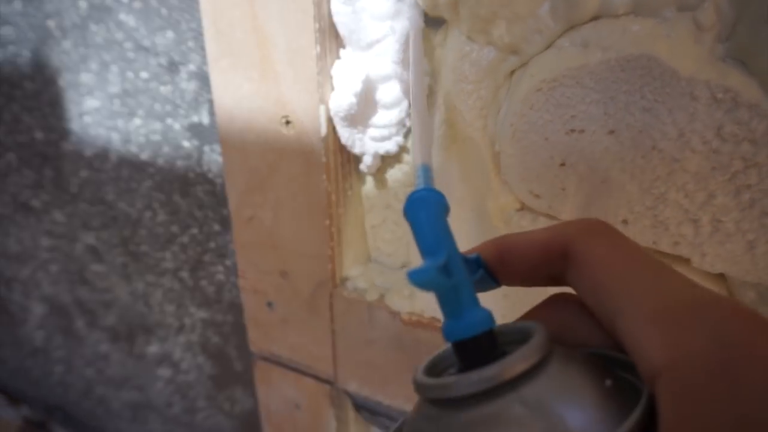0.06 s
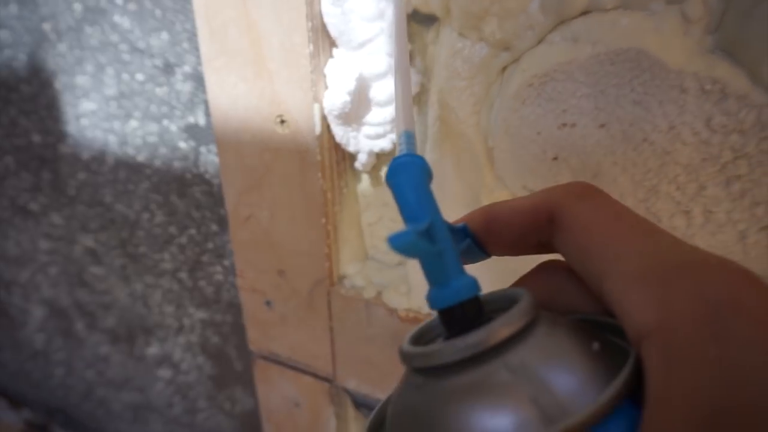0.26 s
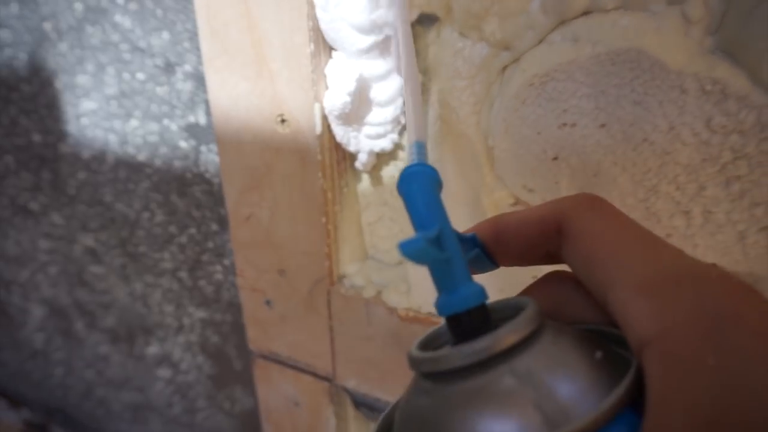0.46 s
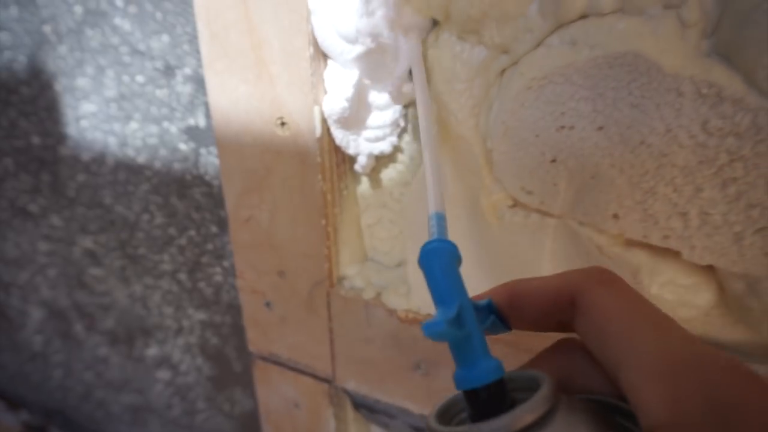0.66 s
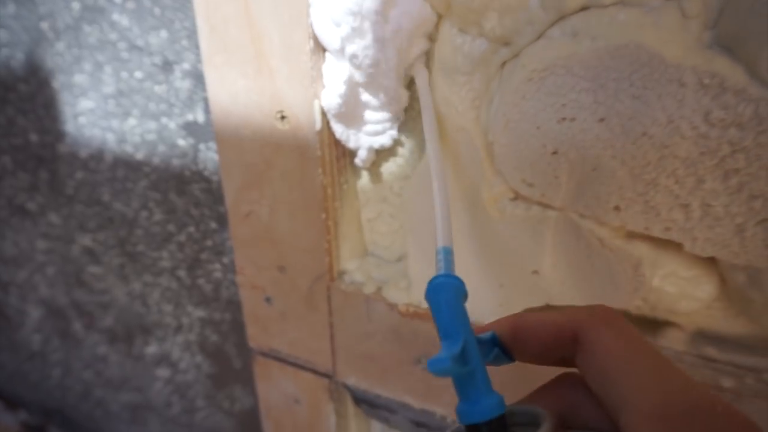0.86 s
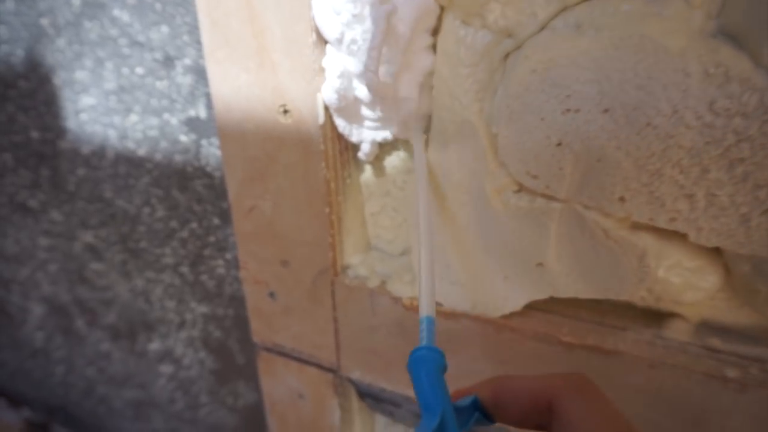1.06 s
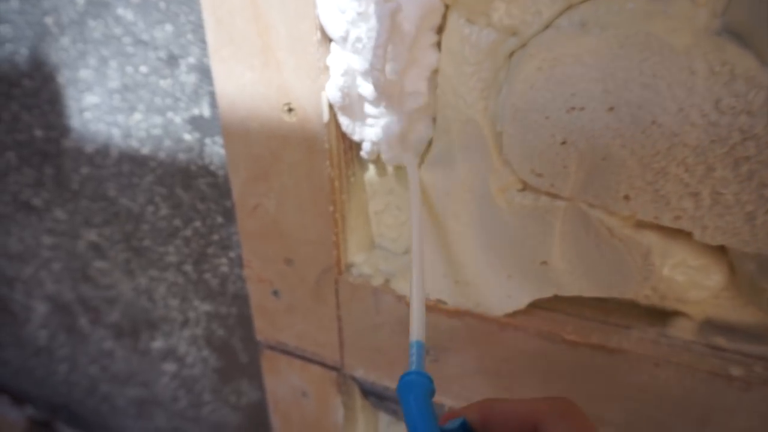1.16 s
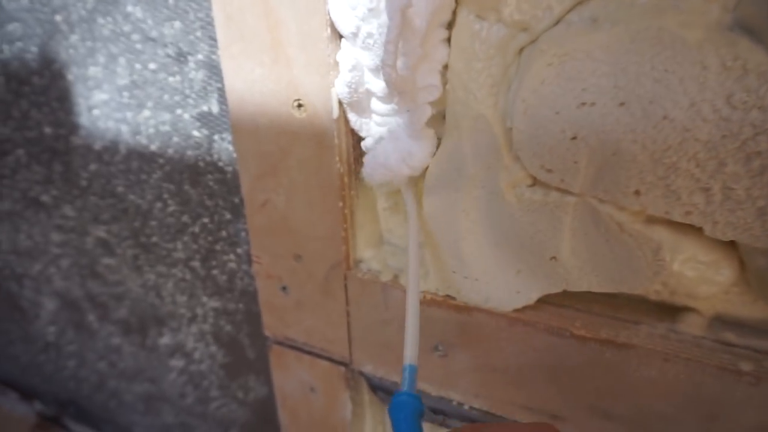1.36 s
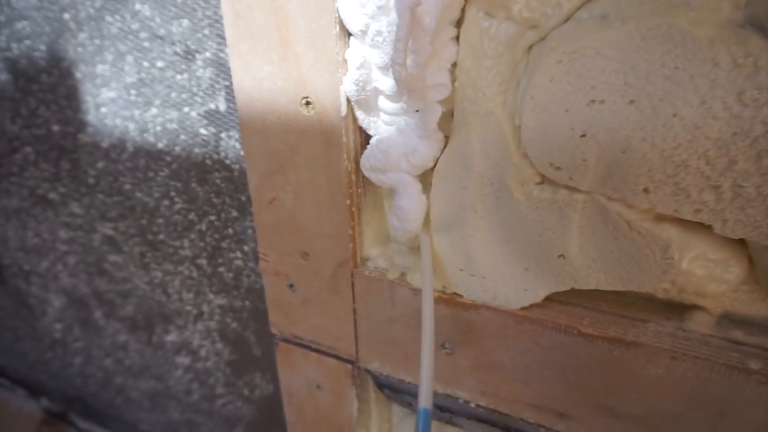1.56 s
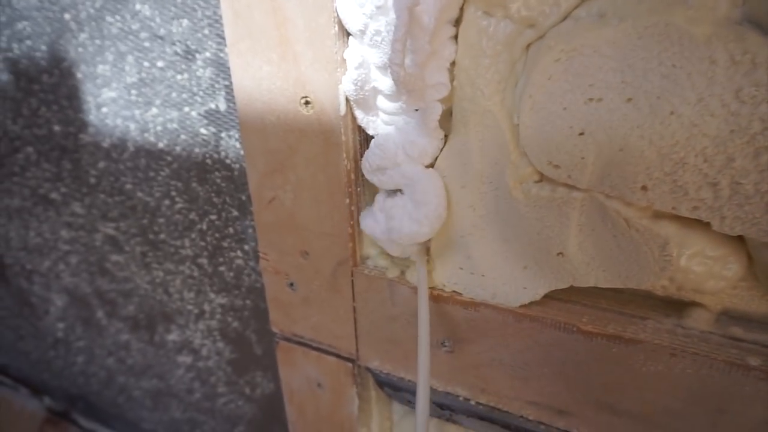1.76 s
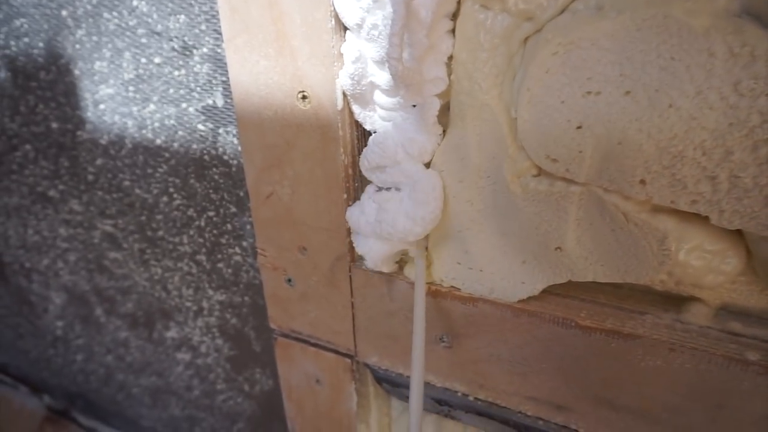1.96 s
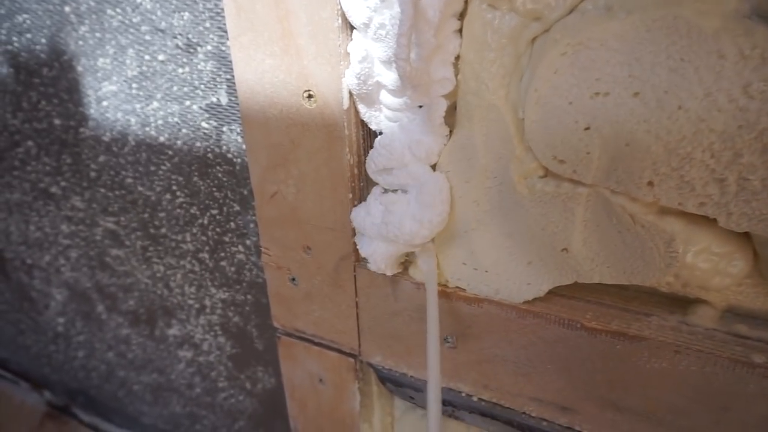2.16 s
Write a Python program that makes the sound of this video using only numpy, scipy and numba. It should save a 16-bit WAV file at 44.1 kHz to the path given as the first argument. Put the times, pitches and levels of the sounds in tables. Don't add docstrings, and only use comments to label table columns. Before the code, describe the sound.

Spray foam hisses from an aerosol can through a thin straw, starting muffled and hollow, growing louder and brighter, then cutting off quickly; close microphone in a padded van with a faint low motor drone.

```python
import sys
import numpy as np
from scipy import signal
from scipy.fft import rfft, irfft
from scipy.io import wavfile
from scipy.ndimage import uniform_filter1d
from numba import njit

SR = 44100
rng = np.random.default_rng(int(sys.argv[2]) if len(sys.argv) > 2 else 0)


def file_out(sig):
    cols = np.atleast_2d(sig).T
    lim = np.clip(cols, -1, 1)
    pcm = np.round(lim * 32767).astype(np.int16)
    wavfile.write(sys.argv[1], SR, pcm)


def convert_level_to_amplitude(level_db):
    exponent = np.asarray(level_db, float) / 20
    return 10 ** exponent


N = 97020
TIME = np.arange(N) / SR
OPPOSITE = np.array([[1], [-1]])

OPEN_S, CLOSE_S, RELEASE_DB_PER_S = 0.182, 1.911, 304


def level(x, db):
    return x * convert_level_to_amplitude(db) / np.sqrt(np.mean(x ** 2))


def column(table, index):
    rows = np.array(table, float)
    return np.interp(TIME, rows[:, 0], rows[:, index])


def pan(db):
    return convert_level_to_amplitude(np.array([[db / 2], [-db / 2]]))


@njit
def svf(x, hz, width):
    y, band, low = np.empty(len(x)), 0., 0.
    for i in range(len(x)):
        g, damping = np.tan(np.pi * hz[i] / SR), width[i] / hz[i]
        v = (band + g * (x[i] - low)) / (1 + g * (g + damping))
        band, low, y[i] = 2 * v - band, low + 2 * g * v, damping * v
    return y


def ring(x, hz, width):
    hz, width = hz * np.ones(N), width * np.ones(N)
    return level(svf(svf(x, hz, width), hz, 1.58 * width), 0)


def colour(x, points):
    p = np.array(points, float)
    log_hz = np.log(np.maximum(np.arange(N // 2 + 1) * SR / N, 1))
    db = np.interp(log_hz, np.log(p[:, 0]), p[:, 1])
    db = db - 30 * np.maximum(np.log(p[0, 0]) - log_hz, 0)
    return level(irfft(rfft(x) * convert_level_to_amplitude(db), N), 0)


def walk(rate):
    hold = int(SR / rate)
    w = np.repeat(rng.standard_normal(N // hold + 1), hold)
    w = uniform_filter1d(uniform_filter1d(w, hold), hold)[:N]
    return (w - w.mean()) / w.std()


# time in [s], slug depth in [dB]
SPUTTER = [
    (.19, 1.5),
    (.5, 0.5),
    (.9, 1.5),
    (1.2, 0.1),
    (1.9, 0.3),
]


def gas():
    pops_per_s, pop_spread_db, pop_cap_db, pops_db = 1500, 2.5, 13, 2.5
    slugs_per_s, surges_per_s, surge_share, even_s = 220, 90, 0.5, 0.035
    timing, polarity, size = rng.random((N, 3)).T
    size_db = np.minimum(-pop_spread_db * np.log(size + 1e-9), pop_cap_db)
    pops = (timing < pops_per_s / SR) * np.sign(polarity - 0.5) * convert_level_to_amplitude(size_db)
    swing = walk(slugs_per_s) + surge_share * walk(surges_per_s)
    slugs = convert_level_to_amplitude(column(SPUTTER, index=1) * swing)
    slugs = slugs / np.sqrt(uniform_filter1d(slugs ** 2, size=int(even_s * SR)))
    return (rng.standard_normal(N) + level(pops, pops_db)) * slugs


def valve():
    attack_s = 0.003
    snap = np.clip((TIME - OPEN_S) / attack_s, 0, 1)
    return snap * convert_level_to_amplitude(-RELEASE_DB_PER_S * np.maximum(TIME - CLOSE_S, 0))


def modes(x, table):
    flicker_db, drift = 1.03, 0.012
    out = np.zeros((2, N))
    for k, (hz, width, db, pan_db) in enumerate(table):
        gain = (-1) ** k * pan(pan_db) * convert_level_to_amplitude(db + flicker_db * walk(13.8))
        out += gain * ring(x, hz * (1 + drift * walk(6.59)), width)
    return level(out, 0)


# time in [s], flow level in [dB], brightness (fizz) in [dB],
# tip in foam (weight of the lowest straw modes) in [dB], pressure (weight of the upper modes) in [dB]
FLOW = [(0.19, -32, -12, -9, -2.5), (0.26, -31.5, -27, -5.5, -7), (0.532, -34, -10, -2.5, -8),
        (0.632, -29, -8, -4.5, 2.5), (0.66, -25.5, -16, -9.5, -1), (0.718, -27.5, -8.5, -3, 0.5),
        (0.874, -28, -10, -7.5, -4), (0.922, -26.5, -2.5, -3, -3), (0.928, -22, -7.5, -9, -6.5),
        (1.008, -21.5, -12, -4, -5), (1.084, -24, -1.5, -3, 4), (1.28, -26.5, -5, 6, 4.5),
        (1.404, -28, -0.5, 6.5, 5.5), (1.446, -23.5, -3.5, 3.5, -2.5), (1.698, -23.5, -5.5, 1.5, 4),
        (1.832, -21, -14.5, 0.5, -1.5), (1.846, -25.5, -5.5, 8.5, 5), (1.9, -28, -12, 3, 0.5)]
# time in [s], upper over lower middle straw mode in [dB]
FILL = [
    (.19, -2),
    (.3, -3.5),
    (.5, -9),
    (.65, -4),
    (.85, 2),
    (.98, 2),
    (1.1, 10),
    (1.3, -4),
    (1.45, 1),
    (1.9, 8),
]
# centre in [Hz], width in [Hz], level in [dB],
# left over right in [dB]
STRAW_LOW = [(1044, 213, -5.5, 2), (1443, 370, 1, 1), (1762, 340, 3, -1.5)]
STRAW = [(2182, 740, -4.5, -1.3), (2885, 330, 1, -0.29)]
STRAW_HIGH = [(3350, 300, -7, 1), (4030, 520, 0, 4), (4620, 420, -6, 4), (5200, 520, -7, 4)]
# frequency in [Hz], density in [dB per Hz]
JET = [(1100, -11.5), (2000, -4), (3300, 6.5), (5500, -12.5), (7000, -20.5)]


def straw(x):
    jet_db, low_linger = -11, 0.68
    fill = convert_level_to_amplitude(column(FILL, index=1))
    middle = (modes(x, STRAW[:1]) - fill * modes(x, STRAW[1:])) / np.sqrt(1 + fill ** 2)
    upper = convert_level_to_amplitude(column(FLOW, index=4)) * modes(x, STRAW_HIGH)
    since_close = np.clip(TIME - CLOSE_S, 0, 0.15)
    linger = convert_level_to_amplitude((1 - low_linger) * RELEASE_DB_PER_S * since_close)
    lowest = linger * convert_level_to_amplitude(column(FLOW, index=3)) * modes(x, STRAW_LOW)
    return middle + convert_level_to_amplitude(jet_db) * colour(x, JET) + upper - lowest


# frequency in [Hz], density in [dB per Hz]
FIZZ = [(4500, -10), (6000, 7.5), (7400, 2.5), (8800, -1), (11200, -9)]


def fizz(x):
    surge_db, pan_db, side_db = 1.7, 3, -4.5
    wide = colour(x, FIZZ) + convert_level_to_amplitude(side_db) * colour(gas(), FIZZ) * OPPOSITE
    return convert_level_to_amplitude(column(FLOW, index=2) + surge_db * walk(45.13)) * pan(pan_db) * wide


# time in [s], resonance in [Hz], level in [dB]
GAP = [
    (.19, 820, -40),
    (.3, 820, -34.5),
    (.4, 800, -25),
    (.55, 814, -25),
    (.66, 590, -28),
    (.8, 690, -27),
    (1.02, 630, -25.5),
    (1.14, 578, -34.5),
    (1.9, 650, -39.5),
]


def gap(x):
    width_hz, low_db = 370, -13.5
    hum = ring(x, column(GAP, index=1), width_hz) - convert_level_to_amplitude(low_db) * ring(x, 305, 390)
    return hum * convert_level_to_amplitude(column(GAP, index=2) + 0.27 * walk(16.3)) * pan(0.73)


# time in [s], resonance in [Hz], level in [dB]
MOUTH = [
    (.9, 2400, -42),
    (.98, 2550, -28),
    (1.06, 3300, -35),
    (1.17, 3600, -29.5),
    (1.27, 5230, -41),
    (1.41, 7060, -41.5),
]


def mouth(x):
    width_share, pan_db = 0.4, 4
    hz = column(MOUTH, index=1)
    during = (TIME > MOUTH[0][0]) * (TIME < MOUTH[-1][0])
    return ring(x, hz, width_share * hz) * convert_level_to_amplitude(column(MOUTH, index=2)) * during * pan(pan_db)


# time in [s], notch in [Hz], depth from 0 to 1
PANEL = [
    (.2, 5930, .4),
    (.92, 6300, 0.4),
    (1.08, 5500, 0.2),
    (1.22, 5740, 0.43),
    (1.3, 8560, 0.8),
    (1.39, 10000, 0.5),
    (1.42, 6400, 0.9),
    (1.68, 6340, 0.62),
    (1.86, 8100, 0.07),
]


def panel(x):
    jitter, width_share = 0.03, 0.3
    hz = column(PANEL, index=1) * (1 + jitter * walk(40.1))
    depth = np.clip(column(PANEL, index=2), 0, 1)
    return np.array([side - depth * svf(side, hz, width_share * hz) for side in x])


def spray():
    x = gas()
    jet = convert_level_to_amplitude(column(FLOW, index=1)) * (straw(x) + fizz(x))
    return valve() * panel(jet + gap(x) + mouth(x))


def cabin(x):
    t60_s, cabin_db, low_hz, high_hz = 0.24, -12.5, 455, 5160
    t = np.arange(SR // 2) / SR
    tail = rng.standard_normal((2, len(t))) * convert_level_to_amplitude(-60 * t / t60_s) * (t > 0.0015)
    tail = signal.lfilter(*signal.butter(1, [low_hz, high_hz], "band", fs=SR), tail)
    tail = tail / np.sqrt(np.sum(tail ** 2, axis=1, keepdims=True))
    mono = x.mean(axis=0, keepdims=True)
    return convert_level_to_amplitude(cabin_db) * signal.fftconvolve(mono, tail, axes=1)[:, :N]


# frequency in [Hz], density in [dB per Hz]
LEAK = [(700, -2), (1000, 3.5), (1300, -6), (2500, -5), (4200, -13.5), (5500, -7), (7000, -11),
        (9500, -12.5)]


def leak():
    leak_db, open_db, pan_db = -45, -4, 0.2
    hiss = [colour(rng.standard_normal(N), LEAK) for _ in range(3)]
    wide = hiss[0] + 1.78 * np.array(hiss[1:])
    release_db = RELEASE_DB_PER_S * np.maximum(TIME - CLOSE_S, 0)
    fade = convert_level_to_amplitude(0.76 * walk(60.3) + open_db * (TIME > OPEN_S) - release_db)
    return convert_level_to_amplitude(leak_db) * fade * pan(pan_db) * wide


# frequency in [Hz], rms level in [dB]
MOTOR = [(70, -56.5), (120, -52.5), (140, -46.5), (212, -53.5), (350, -56.5), (480, -49.5)]


def motor():
    wobble_db, sway_rad = 2.2, 0.45
    tones = np.zeros(N)
    for hz, db in MOTOR:
        tone = np.sqrt(2) * np.sin(2 * np.pi * hz * TIME + sway_rad * walk(7.14))
        tones += convert_level_to_amplitude(db + wobble_db * walk(15.9)) * tone
    return tones


# frequency in [Hz], density in [dB per Hz]
VAN = [(30, -15), (70, -9.5), (150, -4), (400, -3), (550, -9.5), (1500, -14), (4000, -25.5), (11000, -48.5)]


def van():
    van_db, side_db = -44, -13.5
    mid, side = (colour(rng.standard_normal(N), VAN) for _ in range(2))
    highs = mid - signal.lfilter(*signal.butter(1, 500, fs=SR), mid)
    left = 1.62 * highs * np.array([[1], [0]])
    return convert_level_to_amplitude(van_db) * (mid + left + convert_level_to_amplitude(side_db) * side * OPPOSITE)


def scene():
    clamp_db, duck_per_db, duck = -22, 1.7, int(0.09 * SR)
    near = spray()
    loud_db = 10 * np.log10(uniform_filter1d(np.mean(near ** 2, axis=0), duck) + 1e-9)
    duck_db = -duck_per_db * uniform_filter1d(np.maximum(loud_db - clamp_db, 0), duck)
    return near + cabin(near) + convert_level_to_amplitude(duck_db) * (leak() + motor() + van())


def top_cut(x):
    return signal.sosfilt(signal.butter(12, 12330, fs=SR, output="sos"), x)


def record(dry):
    top_hz = 11080
    low_pass = signal.ellip(10, 0.3, 80, top_hz, fs=SR, output="sos")
    return top_cut(signal.sosfilt(low_pass, np.tanh(dry)))


dry = scene()
out = record(dry)
file_out(out)
```